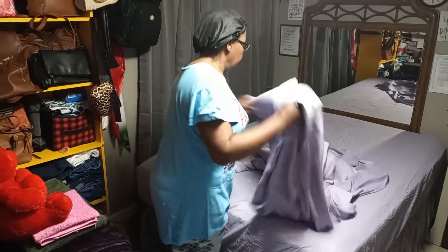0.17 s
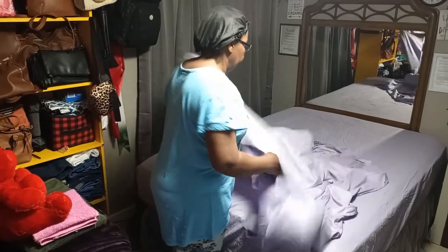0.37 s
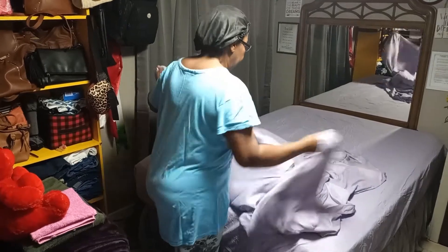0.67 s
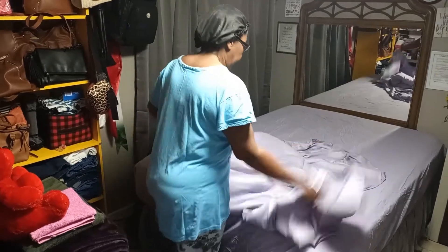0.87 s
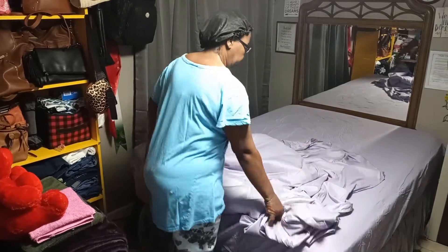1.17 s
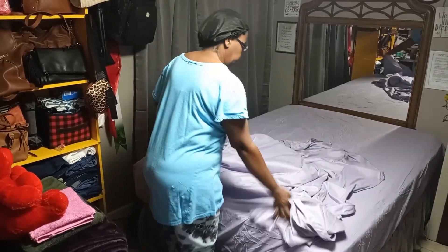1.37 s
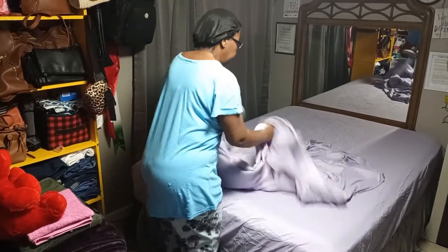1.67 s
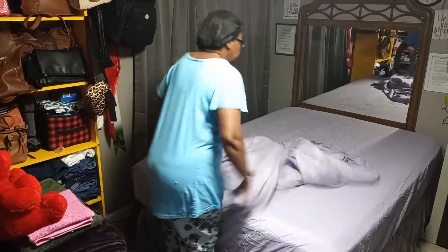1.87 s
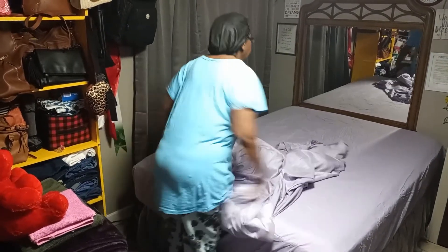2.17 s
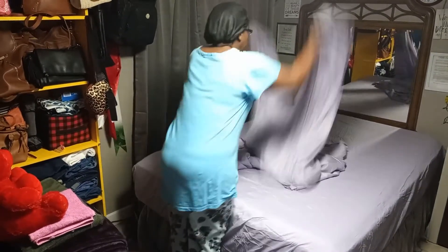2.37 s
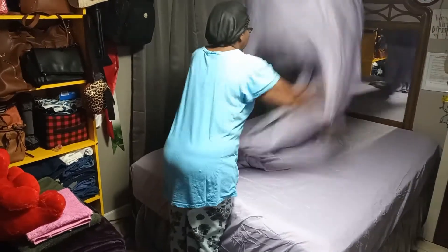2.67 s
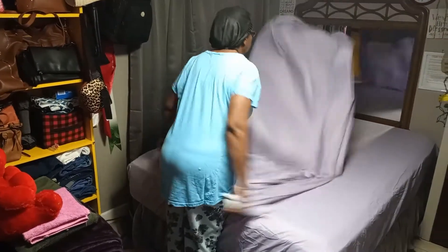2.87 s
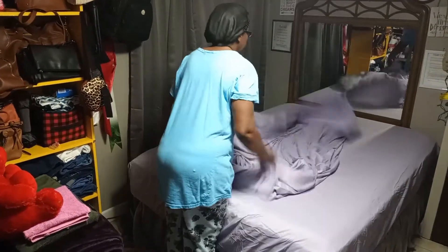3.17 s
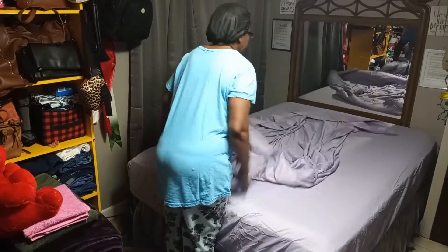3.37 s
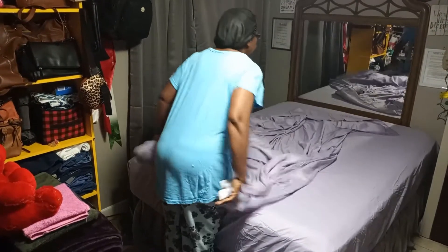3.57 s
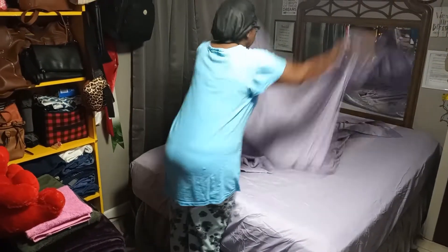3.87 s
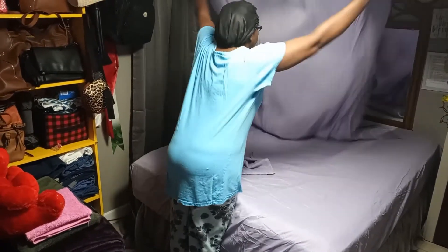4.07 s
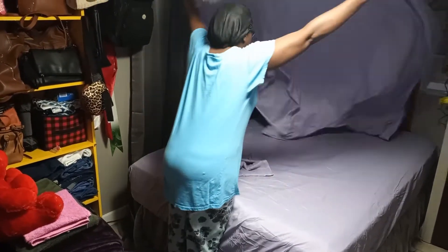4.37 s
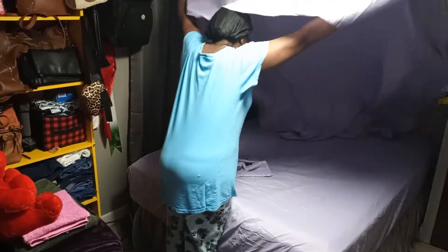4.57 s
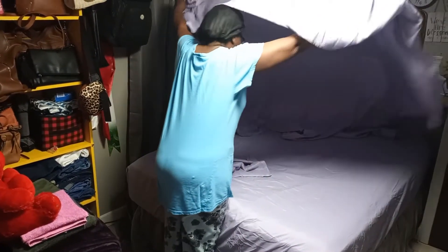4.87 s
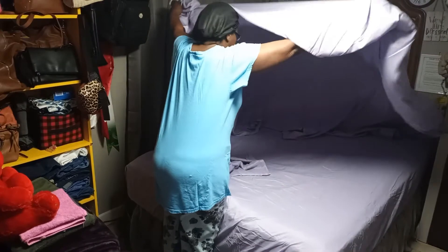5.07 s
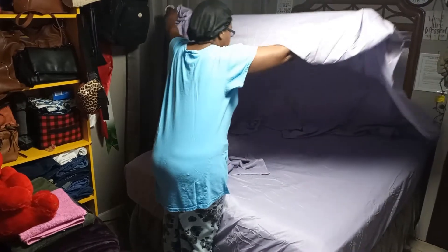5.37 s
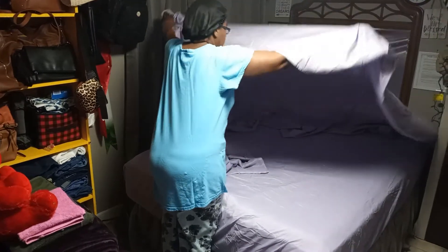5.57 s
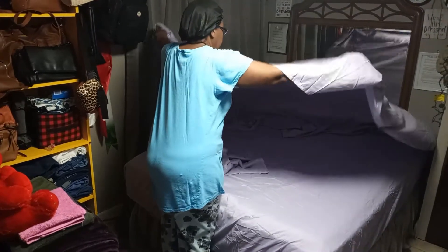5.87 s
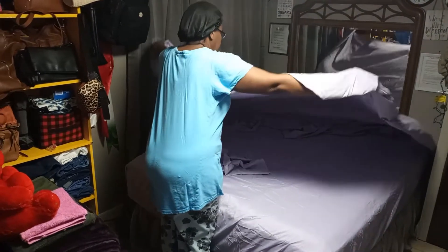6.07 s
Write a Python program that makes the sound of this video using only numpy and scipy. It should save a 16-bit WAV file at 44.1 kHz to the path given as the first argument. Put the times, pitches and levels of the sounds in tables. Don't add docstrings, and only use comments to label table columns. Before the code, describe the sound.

In a small, soft bedroom with faint vent hiss, a cotton sheet is gathered with light swishes and crisp little snaps. The shaking grows into a loud, thumping fling midway, followed by smaller flaps and a second, softer billow. It then falls nearly quiet, with a brief seam-like rip and a dull heel thud at the end. A small recorder makes the treble peaky, with tiny dropouts.

```python
import sys
import numpy as np
from scipy import signal
from scipy.fft import rfft, irfft, next_fast_len
from scipy.io import wavfile
from scipy.ndimage import uniform_filter1d, map_coordinates

SR = 44100
rng = np.random.default_rng(int(sys.argv[2]) if len(sys.argv) > 2 else 0)


def voltage_ratio(level):
    return 10 ** (np.asarray(level, float) / 20)


def output_pcm(signal):
    pcm = np.clip(np.atleast_2d(signal).T, -1, 1) * 32767
    wavfile.write(sys.argv[1], SR, np.round(pcm).astype(np.int16))


N = 274292

# peak t/s, 10 dB rise/s, 10 dB fall/s, fine hiss level/dB, coarse drag re hiss/dB
PULLS = [(.282, .006, 0.08, -59, 2), (.34, .05, .05, -57, -4), (.98, .06, .1, -60, -9),
         (.412, 0.06, 0.06, -54, -3), (.775, 0.06, 0.12, -54, -10), (1.151, 0.0651, 0.05, -50.5, -7),
         (1.3, 0.1, 0.45, -54, -10.5), (1.492, 0.0338, .02, -48, 0), (1.42, .02, 0.5, -58, -4),
         (1.851, 0.1, 0.1, -46.5, -4.5), (2.165, 0.05, 0.17, -46, -7), (2.325, 0.0744, 0.09, -44.5, -6),
         (2.578, .03, 0.0576, -38.5, -3), (2.712, .015, 0.0255, -34.5, -4),
         (2.775, 0.19, 0.0972, -40.5, -6.5), (2.9, .02, 0.18, -57, -5.5), (3.203, 0.19, 0.075, -49, -7.5),
         (3.385, .008, 0.1447, -50.5, -4), (3.65, 0.1, 0.15, -52.5, -4.5), (3.79, .1, 0.15, -47, -5),
         (3.9, 0.07, 0.19, -50, -6), (4.455, .01, 0.16, -60, -11), (4.04, .02, 0.11, -55, -6),
         (3.42, 0.12, 0.02, -53.5, -4), (2.64, 0.0253, 0.0949, -48, -7)]
TEARS = [
    (4.958, 0.0083, 0.039, -45.5, -11),
    (5.002, 0.037, 0.014, -49, -2),
]
# t/s, level/dB
HANDLING = [(0, -59.5), (.6, -58), (1.1, -66), (2.0, -63), (4.3, -60.5), (4.63, -63), (4.8, -68.5),
            (5.2, -68), (5.5, -70), (5.7, -63), (6.0, -58.5), (6.22, -69)]
# f/Hz, density/dB
FINE_HISS = [(2600, -59), (3550, -15.5), (3750, -15), (5200, -8), (5600, -4), (6600, 0.5), (7500, -0.5),
             (8100, -13.5), (9000, -18.5), (10500, -27.5), (14000, -64.5)]
# f/Hz, density/dB
COARSE_DRAG = [(650, -6.5), (1100, 0.5), (1310, 0), (2180, 3.5), (3190, 3.5), (5000, 1.5), (6500, -12),
               (11000, -120)]
# f/Hz, density/dB
SHEEN = [(8500, -33), (9500, -11), (10400, -4), (11500, 0.5), (12800, -5.5), (13900, -9), (14700, 0.5),
         (15300, 5), (16500, -8.5)]
IDLE_DRAG_DB, IDLE_SHEEN_DB, PULL_SHEEN_DB, TEAR_SHEEN_DB = -18, -7, -5.5, -11.5
DRAG_QUICKER = 1.33
SHEEN_GROWTH, SHEEN_FROM_DB = 0.058, -50

# start t/s, length/s, first belly level/dB, last belly level/dB, edge re belly/dB
BEATS = [(.288, 0.127, -50.5, -51, -9), (1.145, 0.012, -66, -63.5, 4), (1.28, 0.098, -73, -76, -0.5),
         (1.445, .21, -57, -67.5, -6.5), (1.705, 0.072, -59, -50.5, -5.5), (1.8, 0.091, -45.5, -48, -10.5),
         (2.1, 0.1, -46.5, -41, -7.5), (2.23, 0.27, -38.5, -47, -6.5), (2.566, 0.13, -31, -36.5, -6),
         (2.7, 0.07, -35, -39, -3), (2.78, 0.14, -40.5, -47.5, -4.5), (2.93, 0.044, -53, -59.5, -8),
         (3.066, 0.15, -53, -50.5, -5.5), (3.383, 0.112, -49, -53.5, -8), (3.52, 0.11, -67, -67, -7),
         (3.628, 0.089, -54.5, -56, 0), (3.728, 0.022, -46.5, -41, -5), (3.765, 0.11, -37, -39.5, -6),
         (3.875, 0.093, -39, -43, -11.5), (3.98, 0.088, -52, -54.5, -17), (4.09, 0.27, -56, -65, -20),
         (4.435, 0.084, -65, -68, -6), (4.57, 0.068, -66, -68, -11), (4.76, .06, -63, -69, -27),
         (5.94, .09, -66, -69, -9)]
# f/Hz, width/Hz, level/dB
BELLY_MODES = [(173, 96, -7.5), (234, 149, 9.5), (332, 20, -13.5), (370, 30, -1.5)]
# f/Hz, width/Hz, level/dB
EDGE_MODES = [(658, 51, -5.5), (787, 112, -0.5), (965, 92, -3), (1636, 820, -9)]
HANG_DB, HANG_EDGE_DB = -77.5, -10
FILL_S, EMPTY_S = 0.011, 0.02
SLACK_HZ, SLACK_BELOW_DB = 340, -9
# t/s, peak level/dB, belly f/Hz, edge re belly/dB
THUMPS = [(0.2775, -41, 227, -6), (1.484, -51.5, 300, 1), (1.802, -45.5, 240, 1), (2.222, -26.5, 226, 0),
          (2.268, -29, 238, -26), (2.349, -34, 258, -20), (2.5505, -14, 266, -10.5), (2.577, -23, 235, -30),
          (2.6222, -20, 260, -21), (2.5405, -25, 285, -9), (2.562, -27, 330, -3), (2.589, -25, 300, -20),
          (2.635, -30, 298, -17), (2.569, -26.5, 500, -8), (2.677, -32, 227, -14), (1.838, -38, 228, -8),
          (1.879, -39, 240, -15), (2.132, -41, 202, -10), (2.297, -32.5, 220, -20), (2.366, -34.5, 200, -5),
          (2.424, -36.5, 200, -9), (2.457, -41, 230, -22), (2.853, -39, 240, -14), (2.885, -37, 199, -17),
          (2.919, -39.5, 232, -4.5), (3.072, -46, 252, -21), (3.144, -41, 220, -8),
          (3.213, -43.5, 288, -23), (3.731, -38, 240, -12), (3.972, -40.5, 240, -17),
          (4.048, -45, 294, -10), (4.17, -46, 242, -21), (4.478, -60, 236, -14), (4.573, -57, 288, -14),
          (4.628, -64, 202, -11), (2.7046, -18.5, 230, -12.5), (2.7105, -25, 225, -20),
          (2.718, -21, 240, -24), (2.615, -28, 250, -20), (2.335, -36, 220, -20), (.2925, -42, 230, -20),
          (3.377, -49, 288, 3), (3.463, -44, 348, -26), (3.762, -31, 394, -13), (3.769, -30.5, 370, -15),
          (3.828, -32, 232, -3.5), (3.889, -29, 238, -9), (3.918, -24.5, 234, -21),
          (3.947, -31.5, 270, -29)]

# t/s, peak level/dB, centre f/Hz, t60/s
SNAPS = [(0.276, -40, 3200, 0.012), (1.1318, -58, 7240, 0.012), (1.144, -43, 7100, 0.012),
         (1.1485, -47, 6000, 0.02), (1.153, -46, 5600, 0.03), (1.135, -48, 6600, .03),
         (1.475, -50, 7400, 0.016), (1.4805, -35, 6460, 0.0072), (1.4835, -27, 5540, 0.013),
         (1.4868, -33, 4250, 0.028), (2.576, -23, 7400, 0.006), (.411, -41, 3000, 0.03),
         (2.701, -31, 7300, .04), (2.7065, -30, 7000, .03), (3.396, -40, 3500, .01), (2.55, -39, 7300, .05),
         (2.275, -31, 4000, 0.013), (2.7124, -24, 6440, 0.022), (2.7189, -25, 6190, 0.024),
         (3.3729, -37, 4200, 0.02), (3.3804, -26.5, 5380, 0.009), (3.7794, -30, 6400, 0.027),
         (4.4494, -45, 7180, 0.018)]
# t/s, peak level/dB, centre f/Hz, t60/s
RIP = [
    (4.9494, -34, 6900, 0.061),
    (4.95, -36, 6640, 0.041),
    (4.957, -32, 6600, .015),
    (4.9495, -43, 4200, .04),
    (4.969, -37, 6700, 0.031),
    (4.988, -27, 6400, 0.012),
    (4.9905, -33, 6800, 0.04),
    (5.003, -40, 6650, 0.036),
]
# t/s, peak level/dB, f/Hz, t60/s
CRISP_TICKS = [(1.2605, -37, 6500, 0.0062), (1.484, -37.5, 11500, 0.02), (1.4845, -37.5, 15000, 0.02),
               (2.576, -31, 11000, 0.008), (2.576, -30, 9200, .006), (4.951, -47, 9500, .03),
               (4.99, -44, 9000, .02), (2.5775, -40, 15000, 0.02), (2.703, -39, 11500, 0.05),
               (2.702, -39, 15000, 0.04), (4.9885, -43, 11500, 0.02), (4.635, -48.5, 11600, 0.012),
               (5.628, -48.5, 11400, 0.035)]
# t/s, peak level/dB, centre f/Hz, t60/s
DEEP_CREASES = [(0.277, -47, 750, 0.04), (.276, -44, 1700, .02), (3.4075, -44, 2050, .02),
                (3.417, -46, 2200, .02), (0.411, -49, 1750, 0.023), (1.148, -46.5, 2250, 0.056),
                (1.756, -47, 780, 0.03), (1.806, -40, 775, 0.041), (2.304, -38, 940, 0.022),
                (2.33, -40, 2100, 0.02), (2.348, -36, 1800, 0.029), (2.224, -32, 1600, 0.02),
                (3.382, -46, 790, 0.034), (2.125, -43, 1600, 0.035), (2.5765, -24, 1910, 0.015),
                (2.755, -35, 735, 0.02), (2.795, -38.5, 960, 0.023), (1.484, -36, 2900, 0.05),
                (1.488, -40, 2200, .05), (1.488, -44, 900, .03), (2.223, -26, 745, 0.02),
                (2.269, -39, 910, 0.02), (2.346, -32, 1035, 0.064), (2.554, -22.5, 863, 0.025),
                (2.575, -23, 755, 0.022), (2.6665, -21.5, 1060, 0.022), (2.694, -29.5, 921, 0.018),
                (2.702, -22, 970, 0.035), (2.71, -25, 1000, 0.058), (3.3805, -34, 2020, 0.025),
                (3.399, -39, 2090, 0.03), (3.449, -36, 2320, 0.03), (3.4545, -42, 2300, .03),
                (3.451, -45, 2900, 0.033), (2.696, -33, 2600, 0.026), (2.736, -34, 1000, 0.046),
                (3.648, -45, 950, 0.016), (3.834, -29.5, 764, 0.054), (3.892, -33.5, 840, 0.088),
                (4.994, -45, 2110, 0.043), (5.009, -43.5, 2070, 0.13), (5.004, -50, 3200, 0.06),
                (4.996, -55, 1100, 0.065)]
# t/s, peak level/dB, f/Hz, t60/s
PLEATS = [
    (.759, -53, 2120, .09),
    (.774, -53, 2250, .07),
    (.789, -55, 1950, .06),
    (1.297, -52, 1510, .06),
    (1.146, -51, 740, .05),
    (1.155, -57, 410, .04),
    (2.12, -44, 764, .12),
    (1.635, -57, 960, .08),
]

# t/s, level/dB
SHIFTS = [(.37, -58), (.66, -62.5), (.95, -62), (1.46, -69), (1.76, -63), (1.88, -53), (2.24, -45),
          (2.4, -48.5), (2.6, -36.5), (2.81, -51), (3.13, -57), (3.23, -64), (3.42, -57), (3.8, -53),
          (3.91, -48), (4.07, -55), (4.19, -62), (4.559, -61.5), (4.958, -59), (5.06, -62), (5.13, -65),
          (5.393, -57.5), (5.802, -56)]
# t/s, peak level/dB, f/Hz, t60/s
HEEL = [
    (6.016, -33.5, 86, .13),
    (6.05, -57, 170, .15),
    (6.073, -48, 88, .2),
    (6.108, -51, 75, .15),
    (6.12, -55, 150, .15),
    (6.15, -53, 60, .2),
]
# f/Hz, width/Hz, level/dB
BOARD_MODES = [(89, 68, -3.5), (48.9, 46.5, -5)]
STILL_DB = -77
LEAN_S, EASE_S = .05, .055

# f/Hz, density/dB
VENT = [(70, -34), (130, 0.5), (400, -18.5), (1100, -20.5), (2500, -24), (3500, -23.5), (4100, -15),
        (5200, -17.5), (5600, -7.5), (7100, -7.5), (8300, -13.5), (9200, -37), (11300, -15.5),
        (13800, -28.5), (15000, -15.5)]
VENT_DB = -54.5
# f/Hz, rms level/dB
FAN_TONES = [(463.0, -86.5), (619.1, -89.5), (1351, -100)]
# f/Hz, width/Hz, level re hiss/dB
PORT_PEAKS = [(1360, 45, 5), (1650, 40, 4), (1910, 110, 9), (3780, 110, 8), (4280, 130, 8), (4510, 60, 9),
              (5100, 50, 6), (5670, 60, 8), (6450, 35, 4), (6850, 50, 5), (7050, 90, 4), (7420, 65, 5),
              (8340, 70, 6), (11700, 60, 5)]

# f/Hz, level/dB
MIC = [(1000, -6.5), (3000, 8.5), (5200, 0.5), (6800, 14), (7700, 7), (9000, -39.5), (11500, 1.5),
       (13800, -29.5), (15200, -16)]
# t/s, depth/dB, length/s
LOSSES = [(.100, -17, .011), (.443, -16, .010), (.654, -13, .009), (.952, -15, .011), (1.612, -18, .013),
          (1.678, -16, .012), (2.103, -20, .009), (2.148, -13, .008), (2.5145, -40, .011),
          (2.747, -14, .009), (4.367, -21, .013), (4.728, -22, .012), (4.924, -22, .013),
          (5.049, -15, .012), (5.752, -20, .011), (5.902, -19, .010)]
# t/s, f/Hz, peak level/dB, length/s
HELD_TONES = [(.1, 3757, -67, .04), (.945, 1640, -69, .08), (1.612, 1900, -66, .05),
              (1.612, 4500, -63, .05), (1.615, 9700, -74, .04), (1.68, 3850, -65, .05),
              (1.68, 4300, -68, .04), (2.1, 770, -52, .04), (2.145, 780, -50, .05), (2.513, 7200, -48, .03),
              (2.746, 7400, -41, .04), (2.746, 7640, -45, .04), (2.746, 7180, -42, .04),
              (4.365, 4250, -68, .05), (4.728, 4550, -66, .05), (4.92, 4500, -64, .04),
              (4.92, 8400, -68, .04), (5.056, 1800, -68, .045), (5.052, 4200, -63, .04),
              (5.75, 4500, -68, .05), (5.75, 3750, -70, .05), (5.9, 3700, -70, .04)]
TOP_HZ = 15800


def slide():
    pull, pull_drag = swells(PULLS, DRAG_QUICKER)
    tear, tear_drag = swells(TEARS, DRAG_QUICKER)
    t, level_db = np.transpose(HANDLING)
    idle = voltage_ratio(np.interp(np.arange(N) / SR, t, level_db))
    surge = wobble(13)
    threads = grains(rate=2500, spread_db=7.5)

    def joint(*gains):
        return np.sqrt(sum(g ** 2 for g in gains))

    def layer(spectrum, grainy, patchy_db):
        rub = rush(patchy_db, streaky_db=4.0) + grainy * threads
        return unit(filtered(rub, peaky(spectrum, share=0.47)))

    fine = joint(pull, tear, idle) * voltage_ratio(0.34 * surge + 0.37 * wobble(37))
    fine = fine * layer(FINE_HISS, grainy=0.55, patchy_db=2.0)

    drag = joint(pull_drag, tear_drag, idle * voltage_ratio(IDLE_DRAG_DB))
    coarse = drag * voltage_ratio(0.48 * surge + 1.3 * wobble(30)) * layer(COARSE_DRAG, grainy=0.23, patchy_db=1.4)

    pull_gloss = pull * (pull / voltage_ratio(SHEEN_FROM_DB)) ** SHEEN_GROWTH * voltage_ratio(PULL_SHEEN_DB)
    gloss = joint(pull_gloss, tear * voltage_ratio(TEAR_SHEEN_DB), idle * voltage_ratio(IDLE_SHEEN_DB))
    sheen = gloss * voltage_ratio(0.78 * surge + .4 * wobble(43)) * layer(SHEEN, grainy=0.27, patchy_db=1.8)
    return fine + coarse + sheen


def flap():
    full, tight = spells(BEATS)
    push = grains(rate=400, spread_db=0.5) + 1.2 * rush(patchy_db=1.5)
    beat_db = 1.1 * wobble(22)
    belly = filtered(push, modes(BELLY_MODES))
    belly = unit(filtered(belly, lambda f: 1 / (1 + 1j * f / 482) ** 2))
    edge = filtered(push, modes(EDGE_MODES))
    edge = unit(filtered(edge, modes([(850, 1370, 0)])))

    full = np.hypot(full, voltage_ratio(HANG_DB))
    tight = np.hypot(tight, voltage_ratio(HANG_DB + HANG_EDGE_DB))
    taut = np.clip(tight / full / voltage_ratio(SLACK_BELOW_DB), 0, 1)
    slack = unit(filtered(belly, lambda f: 1 / (1 + (f / SLACK_HZ) ** 8)))
    belly = taut * belly + (1 - taut) * slack
    return voltage_ratio(beat_db) * (full * belly + tight * voltage_ratio(1.4 * wobble(35)) * edge)


def thumps():
    out = np.zeros(N + SR)
    t = np.arange(SR // 10) / SR

    def swell(rise_s):
        return (t / rise_s * np.exp(1 - t / rise_s)) ** 2

    for s, db, hz, edge_db in THUMPS:
        edge_hz = rng.uniform(653, 1020)
        belly = np.sin(2 * np.pi * hz * t) * swell(0.94 / hz)
        edge = np.sin(2 * np.pi * edge_hz * t) * swell(0.0019)
        out[round(s * SR):][:len(t)] -= voltage_ratio(db + 1.0) * (belly + voltage_ratio(edge_db) * edge)
    return out[:N]


def snaps(table, width, broad, crack):
    out = np.zeros(N + SR)
    t = np.arange(SR // 5) / SR

    def thin(f):
        return (1j * f / (1500 + 1j * f)) ** 3 * voltage_ratio(along(MIC, f))

    for s, db, hz, t60 in table:
        crackle = voltage_ratio(-60 * t / max(t60, .003))
        walls = 0.1 * voltage_ratio(-60 * t / .13)
        burst = rng.standard_normal(len(t)) * (crackle + crack * voltage_ratio(-60 * t / 0.0068) + walls)
        ring = modes([(hz, width * hz, 0)])
        burst = filtered(burst, lambda f: ring(f) ** 2 + broad * thin(f))
        out[round(s * SR):][:len(t)] += voltage_ratio(db) * burst / np.abs(burst).max()
    return out[:N]


def floor_boards():
    leans = [(s, LEAN_S, EASE_S, db, 0) for s, db in SHIFTS]
    weight = swells(leans, 1)[0] + voltage_ratio(STILL_DB)
    rumble = unit(filtered(rush(patchy_db=0), lambda f: modes(BOARD_MODES)(f) ** 2))
    boom = weight * voltage_ratio(1.5 * wobble(12)) * rumble
    t = np.arange(N) / SR
    for s, db, hz, t60 in HEEL:
        u = np.clip(t - s, 0, None)
        onset = 1 - np.exp(-(u / .02) ** 2)
        boom = boom + voltage_ratio(db + 8 - 60 * u / t60) * onset * np.sin(2 * np.pi * hz * u)
    return boom


def vent():
    hiss = unit(filtered(rush(patchy_db=2., streaky_db=4.5), peaky(VENT, share=1.42)))
    out = voltage_ratio(VENT_DB - 5.5 + 1.6 * wobble(6.5)) * hiss
    t = np.arange(N) / SR
    for hz, db in FAN_TONES:
        out = out + voltage_ratio(db + 1 + 4 * wobble(6)) * np.sin(2 * np.pi * hz * t + 2.2 * wobble(25))
    return out


def rush(patchy_db, streaky_db=0.):
    x = rng.standard_normal(N)
    for size, db, wide, long in [(512, patchy_db, 5, 8), (2048, streaky_db, 2, 5)]:
        z = signal.stft(x, nperseg=size)[2]
        field = uniform_filter1d(rng.standard_normal(z.shape), wide, 0)
        field = uniform_filter1d(field, long, 1)
        x = signal.istft(z * voltage_ratio(db * unit(field)), nperseg=size)[1][:N]
    return unit(x)


def grains(rate, spread_db):
    hit = rng.random(N) < rate / SR
    size = np.minimum(rng.exponential(size=N), 3)
    return unit(hit * voltage_ratio(spread_db * size) * np.sign(rng.standard_normal(N)))


def wobble(rate):
    knots = rng.standard_normal(int(N * rate / SR) + 4)
    return map_coordinates(knots, [np.arange(N) * rate / SR])


def swells(rows, quicker):
    s, rise, fall, db, other_db = np.transpose(rows)[:, :, None]
    u = np.arange(0, N + 128, 128) / SR - s
    lost_db = 10 * np.where(u < 0, -u / np.maximum(rise, .004), u / np.maximum(fall, .004))
    return summed(db - lost_db, db + other_db - quicker * lost_db)


def spells(rows):
    s, length, first, last, other_db = np.transpose(rows)[:, :, None]
    u = np.arange(0, N + 128, 128) / SR - s
    held_db = first + (last - first) * np.clip(u / length, 0, 1)
    lost_db = 10 * (np.maximum(-u, 0) / FILL_S + np.maximum(u - length, 0) / EMPTY_S)
    db = held_db - lost_db
    return summed(db, db + other_db)


def summed(db, other_db):
    def dense(d):
        return np.interp(np.arange(N), np.arange(d.shape[1]) * 128, np.sqrt(voltage_ratio(2 * d).sum(0)))

    return dense(db), dense(other_db)


def peaky(spectrum, share):
    def response(f):
        peaks_db = sum(db / (1 + (2 * (f - hz) / w) ** 2) for hz, w, db in PORT_PEAKS)
        return voltage_ratio(along(spectrum, f) + share * peaks_db)

    return response


def modes(table):
    def response(f):
        total = 0
        for k, (hz, w, db) in enumerate(table):
            total = total + (-1) ** k * voltage_ratio(db) * 1j * f * w / (hz * hz - f * f + 1j * f * w)
        return total

    return response


def filtered(x, response):
    m = next_fast_len(len(x) + 8192)
    return irfft(rfft(x, m) * response(np.fft.rfftfreq(m, 1 / SR)), m)[:len(x)]


def along(points, hz):
    f, v = np.transpose(points)
    return np.interp(np.log(hz + 1), np.log(f + 1), v)


def unit(x):
    return x / np.sqrt(np.mean(x ** 2) + 1e-20)


def scene():
    bright = snaps(SNAPS + RIP, width=.6, broad=.8, crack=.8)
    ticks = snaps(CRISP_TICKS, width=.25, broad=.005, crack=.1)
    dull = snaps(DEEP_CREASES, width=.45, broad=.025, crack=1.2)
    rustle = snaps(PLEATS, width=.2, broad=.004, crack=.2)
    cloth = slide() + flap() + thumps() + bright + ticks + dull + rustle
    return (cloth + floor_boards() + vent())[None]


def bridged(x, count=6, size=1024):
    bass = filtered(x, lambda f: 1 / (1 + (f / 750) ** 8))
    x = x - bass
    out = x.copy()
    n = np.arange(size)
    t = (n - size // 2) / SR
    linger = .22 * np.sin(np.pi * n / size) ** 2
    for s, depth_db, length in LOSSES:
        span = slice(round(s * SR) - size // 2, round(s * SR) + size // 2)
        z = rfft(x[span] * np.hanning(size))
        tops = signal.find_peaks(np.abs(z), distance=count)[0]
        tops = tops[np.argsort(np.abs(z[tops]))[-count:]]
        floor_db = -7 if depth_db > -30 else 1
        tops = tops[np.abs(z[tops]) > voltage_ratio(floor_db) * np.abs(z).max()]
        tones = np.real(z[tops] @ np.exp(2j * np.pi * np.outer(tops, n) / size)) * 4 / size
        shape = np.interp(t / length, [-1.4, -.5, -.15, .35, .6], [0, .35, 1, 1, 0])
        kept = voltage_ratio(depth_db * shape)
        out[span] = x[span] * kept + tones * (1 - kept + linger)
    for s, hz, db, length in HELD_TONES:
        u = np.arange(round(length * SR)) / SR
        tone = np.sin(np.pi * u / length) * np.sin(2 * np.pi * hz * u)
        out[round((s - length / 2) * SR):][:len(u)] += voltage_ratio(db) * tone
    return out + bass


def band_limit(x):
    return signal.sosfilt(signal.butter(12, 15830, fs=SR, output="sos"), x)


def record(dry):
    heard = filtered(dry[0], lambda f: (1j * f / (55 + 1j * f)) ** 2)
    mix = filtered(bridged(heard), lambda f: f < TOP_HZ)[None]
    return band_limit(mix)


dry = scene()
out = record(dry)
output_pcm(out)
```